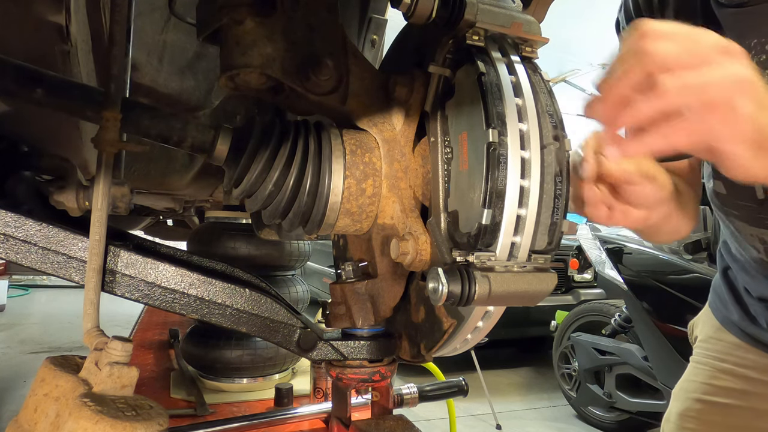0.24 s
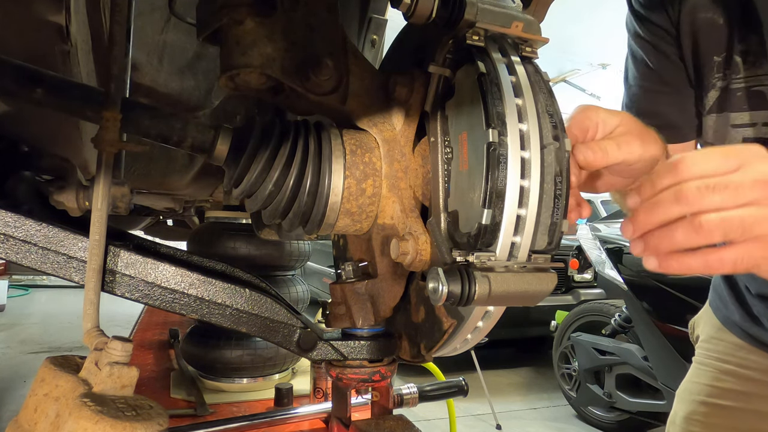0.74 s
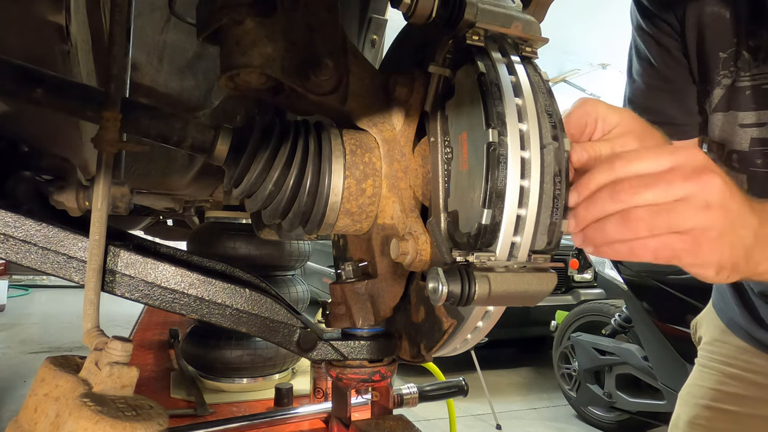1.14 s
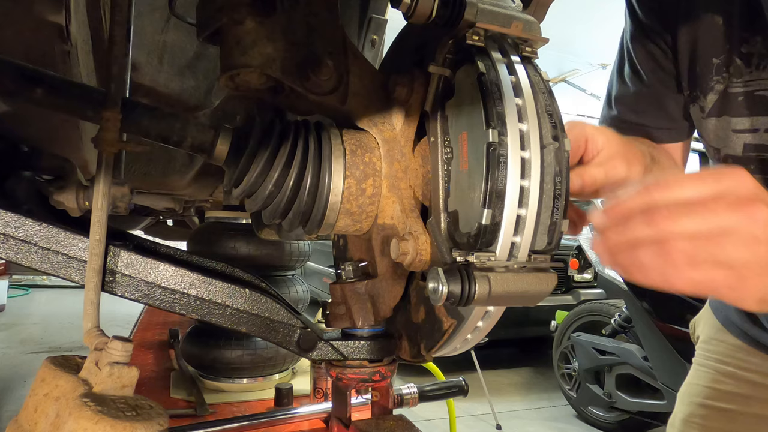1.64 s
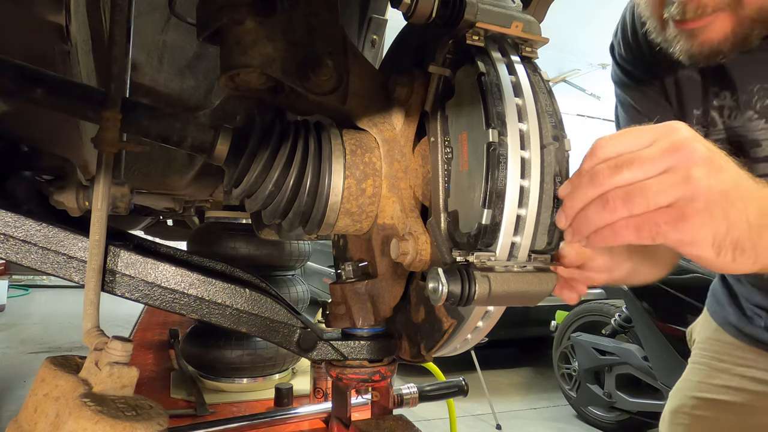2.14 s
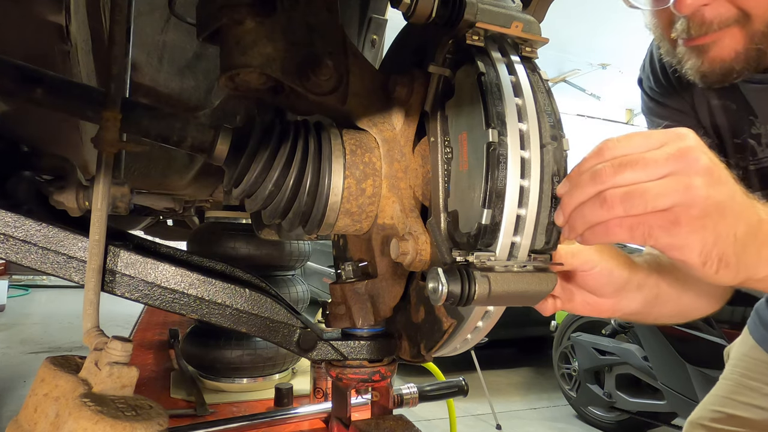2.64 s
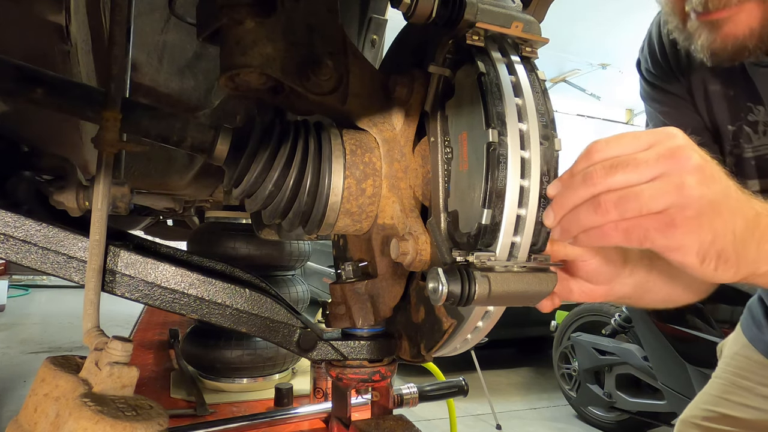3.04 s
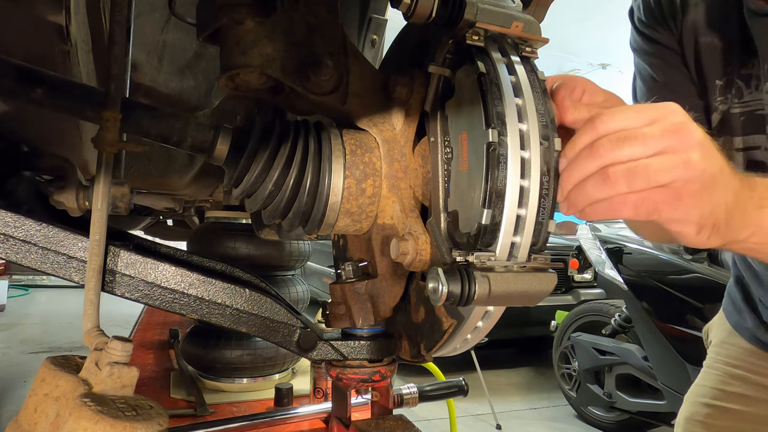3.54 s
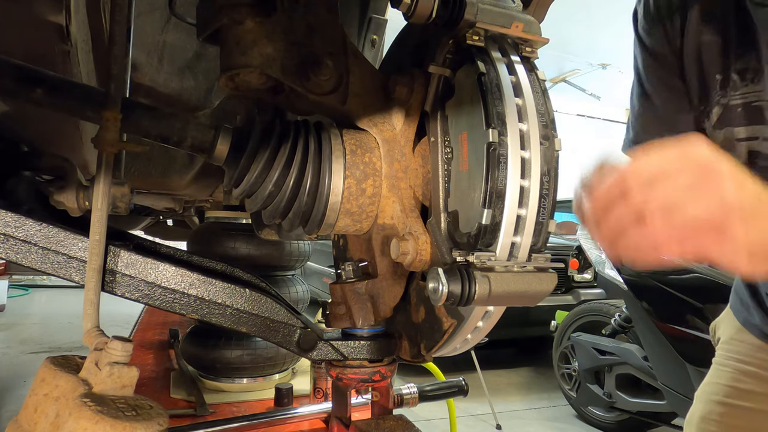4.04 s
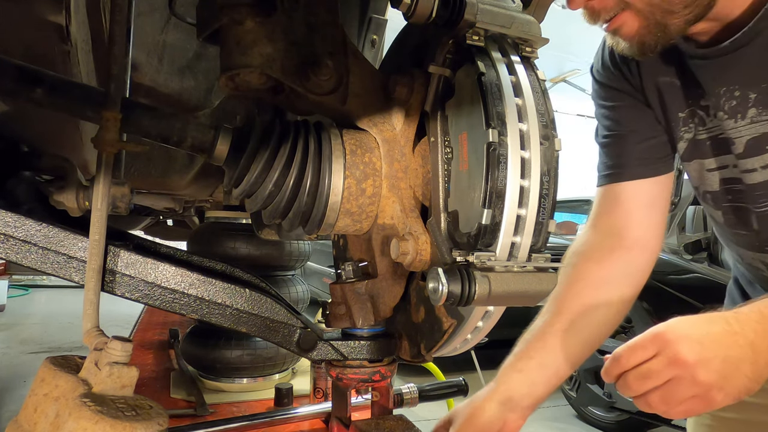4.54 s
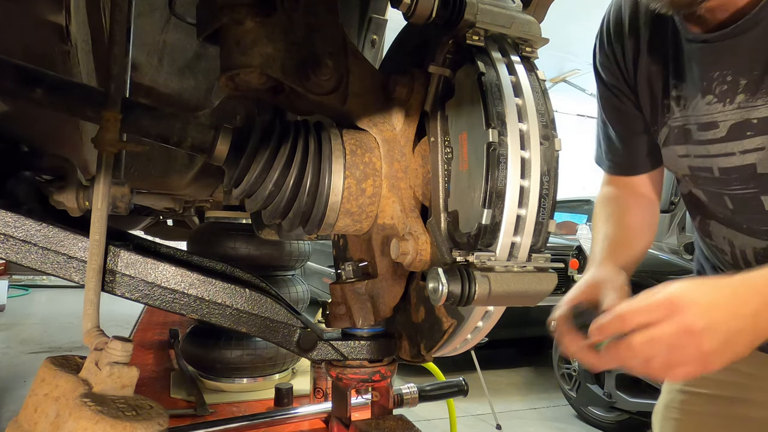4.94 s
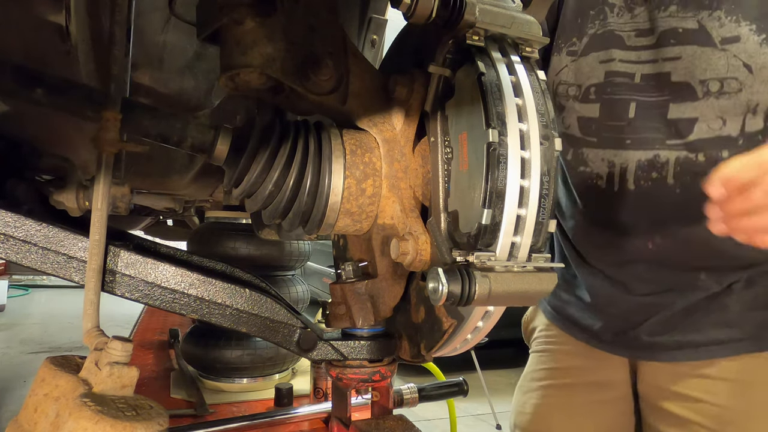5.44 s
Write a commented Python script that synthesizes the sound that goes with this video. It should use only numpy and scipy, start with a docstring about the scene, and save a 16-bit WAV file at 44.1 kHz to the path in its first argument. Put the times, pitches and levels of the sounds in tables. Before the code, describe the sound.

A close microphone hears a brake pad being fitted in a quiet garage, with a short wall echo and a faint low hum of distant machines and street throughout. Right at the start comes a brief scrape and a quick cluster of dull metal knocks. Very faint ticks and rubs follow between 0.4 and 1.6 seconds. From about 2.2 to 2.7 seconds the pad scrapes softly and grittily along its spring clips, with a small click. At 2.8 seconds it snaps home with a loud, sharp double clack, by far the strongest sound; the steel rings briefly and the hub gives a low shudder that dies away by about 3.3 seconds. A few light ticks come between 3.6 and 3.9 seconds. From 4.6 to 5 seconds small parts click, clatter and shuffle at a modest level, and one last light tick sounds near 5.1 seconds.

```python
"""Fitting a brake pad in a quiet garage

Hands work a pad into the spring clips of a caliper bracket. It knocks, scrapes in many tiny
slips and snaps home with a double clack that rings the steel and shakes the hub. Small parts
tick and shuffle afterwards. Two close microphone ports hear it, with the echo of the walls,
over the low hum of distant machines and the street."""
import sys
import numpy as np
from scipy import signal
from scipy.fft import rfft, irfft, next_fast_len
from scipy.io import wavfile
from scipy.ndimage import uniform_filter1d

SR = 44100
rng = np.random.default_rng(int(sys.argv[2]) if len(sys.argv) > 2 else 0)


def to_wav(sig):
    """Store sig (one row per channel, or 1-D mono) as 16-bit WAV at the path in sys.argv[1].

    Samples outside -1..1 are clipped; the rate is SR.
    """
    pcm = np.clip(np.atleast_2d(sig), -1, 1) * 32767
    pcm = np.round(pcm).astype(np.int16)
    wavfile.write(sys.argv[1], SR, pcm.T)  # frames by channels


N = 251811

# Blows on the brake: t/s, snap level/dB, dullness/(dB per octave),
# then level/dB for each of clip, plate, bracket, hub, disc, arm, car body
BLOWS = [(0.014, -34, 10, -56, -42, -53, -54.5, -67, -35.5, -77),
         (0.027, -27.5, 14, -50, -57, -66, -40.5, -92, -30, -71),
         (0.083, -20, 38.5, -65, -18.5, -60, -19, -44, -21.5, -53.5),
         (1.55, -83, 30, -90, -92, -94, -74, -87, -72, -55),
         (2.786, -29, 10, -39, -41, -40, -48, -59, -62.5, -71),
         (2.791, -7, 2.5, -19, -40, -39.5, -41, -50, -35.5, -50.5),
         (2.84, -7, 6.5, -13, -38, -19.5, -33.5, -49.5, -33.5, -38.5),
         (2.851, -23, 18, -39, -13, -35.5, -18, -67, -23, -37.5),
         (2.869, -19, 40, -46, -40, -44, -18.5, -51, -30.5, -34),
         (2.876, -13, 29, -42, -21, -42.5, -14.5, -42.5, -24, -38),
         (2.897, -28, 22.5, -40, -34.5, -40.5, -22, -56, -25, -40),
         (2.93, -53, 27, -51, -57, -59.5, -33, -82, -28, -41.5),
         (2.969, -67, 25, -57, -67, -55, -31.5, -57, -31, -36),
         (3.033, -71, 36, -80, -80, -80, -33, -73, -30, -41.5),
         (3.046, -70, 40, -80, -80, -80, -31, -86, -37, -43),
         (3.07, -69, 22.5, -72, -75, -76.5, -54.5, -72.5, -41, -41),
         (3.168, -86, 32, -70.5, -91, -93.5, -47, -91.5, -52, -49),
         (3.601, -86.5, 23.5, -86.5, -86.5, -89, -63.5, -97, -60, -54.5),
         (3.667, -83.5, 27, -89.5, -83.5, -100.5, -83.5, -98, -65, -53)]
# The tones each part rings with: f/Hz, relative level/dB, time to fade by 60 dB/s
CLIP_TONES = [(2272, -12, .06), (2546, -13, .06), (3082, -17, .07), (3553, -3, .08), (3609, 0, .11),
              (4037, -15, .05), (4834, -14, .07), (6126, -20, .08), (6400, -20, .2), (6860, -12, .06),
              (7840, -21, .06), (9720, -22, .08), (10640, -17, .04)]
PAD_PLATE_TONES = [(1750, -14, .05), (2500, -13, .05), (3348, 0, .12)]
BRACKET_TONES = [(3497, 0, .09), (3515, -12, .4), (3607, -10, .32), (3800, -17, .35), (4190, -1, .05),
                 (4183, -17, .3), (4350, 0, .06), (4490, -11, .33), (4608, -14, .4), (4800, -10, .06),
                 (6010, -25, .5), (6293, -17, .4), (6560, -21, .45), (6845, -18, .55), (7050, -22, .4)]
HUB_TONES = [(580, -5, 0.09), (618, -6, 0.09), (770, -1, 0.07), (810, -1, 0.08), (852, -1, 0.1),
             (890, -2, 0.07), (982, -5, 0.06), (1142, -17, 0.05), (1367, -12, 0.06), (1563, -18, 0.05)]
DISC_TONES = [(2038, -3, 0.65), (2051, -4, 0.5), (2110, -6, 0.14)]
SUSPENSION_ARM_TONES = [(172.7, -8, 0.3), (199, 0.5, 0.067), (245, -8, 0.2), (305, 1, 0.14),
                        (339.2, -8, 0.15), (385, -6, 0.12), (505, -4, 0.09)]
CAR_BODY_TONES = [(40.5, -15, 0.5), (59, -11, .3), (84.8, 0, .4), (99.7, -3, 0.2)]
# Scraping strokes: start t/s, rise/s, hold/s, fall/s, grit level/dB, grit f/Hz,
# hiss level/dB, drag level/dB
SLIDES = [(0.0, 0.0005, 0.009, 0.082, -43.5, 1920, -50, -59),
          (1.185, 0.0073, 0.044, 0.013, -97, 1290, -72, -84),
          (1.483, 0.0036, 0.0085, 0.065, -94, 1890, -65, -77),
          (2.163, 0.025, 0.052, 0.027, -68, 1530, -68.5, -80),
          (2.225, 0.055, 0.069, 0.029, -50.5, 1640, -57.5, -73),
          (2.301, 0.039, 0.025, 0.081, -53, 1220, -59.5, -53.5),
          (2.421, 0.03, 0.022, 0.18, -62, 1310, -66.5, -65.5),
          (2.694, 0.0044, 0.0078, 0.084, -68.5, 1410, -68, -82),
          (4.66, 0.018, 0.026, 0.02, -58, 2850, -56, -59.5),
          (4.716, .008, 0.035, 0.017, -58, 2580, -45.5, -60),
          (4.768, 0.0087, 0.15, 0.098, -74, 2210, -67.5, -87),
          (4.957, 0.011, 0.048, 0.033, -62, 2060, -60, -66)]
# Small parts ticking: t/s, level/dB, f/Hz, time to fade by 60 dB/s (capped at 0.06), share of click
TICKS = [(0.395, -58, 3890, 0.033, 0.05), (1.189, -62, 1160, 0.027, .5), (1.485, -63, 2500, 0.043, 0.38),
         (1.621, -63, 1160, 0.071, 0.84), (2.187, -60, 1580, .04, 0.26), (2.233, -42.5, 1577, 0.079, 0.3),
         (2.697, -67, 1036, 0.034, 0.93), (2.749, -50.5, 1080, 0.073, 0.35), (3.597, -59, 4500, 0.035, 0.9),
         (3.637, -60, 2750, 0.04, .05), (3.664, -48, 1085, 0.05, 0.7), (3.664, -51, 2366, 0.018, 0.13),
         (3.804, -52, 6210, 0.017, 0.73), (3.893, -61, 2400, 0.025, 0.57), (4.64, -58, 2740, 0.041, .4),
         (4.651, -31.5, 693, 0.029, 0.38), (4.675, -53, 3140, 0.057, 0.68),
         (4.693, -35.5, 664, 0.035, 0.53), (4.721, -50, 1140, 0.067, 0.17), (4.741, -34, 3136, 0.053, 0.33),
         (4.731, -42, 5540, 0.067, 0.095), (4.755, -40, 2080, 0.068, 0.08),
         (4.761, -41.5, 4180, 0.085, 0.29), (4.798, -50, 2970, 0.052, 0.73),
         (4.875, -49.5, 1050, 0.085, 0.51), (5.127, -45, 5550, 0.048, 0.26),
         (5.127, -48, 2920, 0.034, 0.21)]
# Tone colour of a snap, a scrape's hiss, the echo and the hum's two layers: f/Hz, relative level/dB
SNAP_COLOUR = [(400, -34), (1500, -16), (2500, -17.5), (4000, -7), (5300, -10), (7000, -2.5), (9000, -10.5),
               (11000, -13), (13000, -26), (16000, -35.5)]
SCRAPE_COLOUR = [(1500, -22.5), (2500, -14.5), (3500, -10), (5500, -12), (8500, -18), (11000, -29.5),
                 (16000, -42)]
ECHO_COLOUR = [(100, -2), (800, -5), (3000, -9), (6000, -8), (12000, -9)]
RUMBLE_COLOUR = [(12, -32), (20, -7.5), (65, -3), (112, -30), (176, 0), (338, -16), (375, -22),
                 (450, -23.5), (580, -53), (990, -120)]
HISS_COLOUR = [(260, -31), (450, -1), (644, -3), (705, -10), (1020, -2), (2330, -12), (3230, -11),
               (3540, -16), (6530, -18), (10000, -29), (15100, -37), (16000, -38)]
# How long the garage echoes: f/Hz, time to fade by 60 dB/s
ECHO_FADE = [(100, 0.3), (260, 0.65), (700, 0.5), (1840, .5), (4850, 0.45), (10000, .38)]
# Balance of the brake and of the hum: f/Hz, left minus right level/dB
BRAKE_BALANCE = [(60, 0), (250, 0), (700, 1.5), (1290, .5), (2380, 3.5), (4400, 1), (8120, -3), (15000, -5)]
HUM_BALANCE = [(60, 1), (200, -8), (400, -7), (1000, -3), (3000, 3.5), (10000, -3)]
# How alike the hum is at the two ports: f/Hz, likeness (0 to 1)
HUM_LIKENESS = [(60, 0.95), (200, 0.21), (700, 0.23), (2500, 0.35), (8000, 1)]
# How far the left port trails the right: f/Hz, phase/rad
PORT_LAG = [(100, .03), (1000, 0.5), (3000, 0.75), (5000, 1.5), (8000, 2.1), (12000, 2.2)]


def brake():
    """Each blow makes a snap and sets seven parts ringing, each by its own amount."""
    steel, heavy, disc = np.zeros((3, N))
    t = np.arange(-60, 16000) / SR  # starts just ahead of the blow
    clip_ring = ring(CLIP_TONES, rise_s=.0008, rough=.5, waver_hz=160)
    plate_ring = ring(PAD_PLATE_TONES, rise_s=.0002, rough=.3, waver_hz=90)
    bracket_ring = ring(BRACKET_TONES, rise_s=.0002, rough=1.1, waver_hz=140)
    disc_ring = ring(DISC_TONES, rise_s=.0009, rough=.3, waver_hz=25)
    body_ring = ring(CAR_BODY_TONES, rise_s=.006, rough=1.2, waver_hz=30)
    noises = rng.standard_normal((len(BLOWS), len(t)))
    for (start, snap_db, dullness, *levels), noise in zip(BLOWS, noises):
        add(steel, start, amp(snap_db) * snap(t, noise, dullness))
        hit = start - t[0]
        for db, part in zip(levels[:3], (clip_ring, plate_ring, bracket_ring)):
            add(steel, hit, amp(db) * filtered(part, lambda f: dulled(f, dullness)))
        hub_db, disc_db, arm_db, body_db = levels[3:]
        # the loose hub and arm waver anew at each blow
        hub_ring = ring(HUB_TONES, rise_s=.0015, rough=.8, waver_hz=80)
        arm_ring = ring(SUSPENSION_ARM_TONES, rise_s=.006, rough=.9, waver_hz=45)
        for db, part in (hub_db, hub_ring), (arm_db, arm_ring), (body_db, body_ring):
            add(heavy, hit, amp(db) * part)
        add(disc, hit, amp(disc_db) * disc_ring)
    return steel, heavy, disc


def snap(t, noise, dullness):
    """A sharp burst, then a duller rattle of tones too crowded to hear apart."""
    noise = noise * (t >= 0)
    burst = noise * fade(t, .012)
    rattle = noise * (fade(t, .055, db=-7) + fade(t, .42, db=-27))
    rattle = filtered(rattle, lambda f: dulled(f, 6))
    crack = filtered(burst + rattle, lambda f: amp(look_up(SNAP_COLOUR, f)) * dulled(f, dullness))
    ending = np.clip((t[-1] - t) / .1, 0, 1) ** 2
    return crack / abs(crack).max() * ending


def ring(tones, rise_s, rough, waver_hz, loosen_s=.012):
    """A struck part's fading tones start firm, then waver as the contact loosens."""
    hz, db, fade_s = np.transpose(tones)[:, :, None]
    t = np.arange(0, 1.3 * fade_s.max(), 1 / SR)
    wobble = wander(len(tones), len(t), waver_hz) + 1j * wander(len(tones), len(t), waver_hz)
    waver = 1 + rough * (1 - np.exp(-t / loosen_s)) * wobble
    waves = fade(t, fade_s, db) * (waver * np.exp(2j * np.pi * hz * t)).imag
    onset = (1 - np.exp(-t / rise_s)) ** 2
    return waves.sum(0) / np.linalg.norm(amp(db)) * np.sqrt(2) * onset


def slide(rise, hold, fall, grit_db, grit_hz, hiss_db, drag_db, slips_per_s=9000, pitch_drop=.17):
    """Tiny uneven slips make grit, bright hiss and low drag as pressure rises, holds and falls."""
    corners = np.cumsum([0, rise, hold, fall])
    t = np.arange(0, corners[-1], 1 / SR)
    slack = np.interp(t, corners, [1, 0, 0, 1])  # 0 at full pressure
    hz = grit_hz * (1 - pitch_drop * t / corners[-1])
    slipping = rng.random(SR)[:len(t)] < slips_per_s / SR
    kicks = rng.standard_normal(SR)[:len(t)]
    size_db = .9 * rng.exponential(1, SR)[:len(t)]
    catch_db = 1.3 * wander(1, SR, hz=70)[0, :len(t)]  # the stroke catches and lets go
    slips = slipping * kicks * amp(size_db + catch_db)
    sinking = unit_level(resonate(resonate(slips, hz, 700), hz, 2000))
    plate = unit_level(filtered(slips, lambda f: 1 / (1 + ((f - 2200) / 900) ** 4)))
    grit = unit_level(filtered(sinking + .5 * plate, lambda f: dulled(f, 12)))
    hiss = unit_level(filtered(slips, lambda f: amp(look_up(SCRAPE_COLOUR, f))))
    drag = unit_level(resonate(resonate(slips, 360, 780), 360, 780))
    sound = (amp(grit_db - 12.5 * slack) * grit
             + amp(hiss_db - 15 * slack) * hiss
             + amp(drag_db - 18.5 * slack) * drag)
    return sound * signal.windows.tukey(len(t), .05)


def ticks():
    """Small parts touch: each gives a click and a short, rough ring at its own pitch."""
    t, out = np.arange(3000) / SR, np.zeros(N)
    for start, db, hz, fade_s, share in TICKS:
        noise = rng.standard_normal(len(t))
        click = filtered(noise, lambda f: f / (f + hz) * dulled(f, 20) / (1 + (f / 8000) ** 8))
        roughness = resonate(resonate(noise, hz, .25 * hz), hz, .4 * hz)
        tone = np.sin(2 * np.pi * hz * t) + 1.1 * unit_level(roughness)
        shape = fade(t, min(fade_s, .06), db) * (1 - np.exp(-t / .001)) ** 2
        add(out, start, shape * ((1 - share) * tone + share * unit_level(click)))
    return out


def garage_echo(sound):
    """The walls return many small echoes; each pitch range fades at its own speed."""
    echoes = np.zeros((2, SR))
    arrivals = np.arange(300, SR - 20, 20) + rng.integers(0, 20, (2, (SR - 301) // 20))
    np.put_along_axis(echoes, arrivals, rng.choice([-1., 1.], arrivals.shape), 1)
    hz, t, (left, other) = signal.stft(echoes, SR, nperseg=256)
    hz = hz[:, None]
    likeness = 1 / (1 + (hz / 800) ** 2)  # the bass is alike at both ports
    bands = np.array([left, blend(left, other, likeness)])
    fade_s = look_up(ECHO_FADE, hz)
    bands *= fade(t, fade_s, look_up(ECHO_COLOUR, hz)) / np.sqrt(fade_s * 160)
    tail = signal.istft(bands, SR, nperseg=256)[1]
    return signal.fftconvolve(sound[None], tail, axes=1)[:, :N]


def hum(rumble_db=-60, hiss_db=-70):
    """Distant machines and street rumble: noise that swells in patches, most of all in the bass."""
    frames, hz = N // 256 + 5, np.fft.rfftfreq(1024, 1 / SR)[:, None]
    noise = rng.standard_normal((frames, 513, 5)).T
    left, other = noise[0] + 1j * noise[1], noise[2] + 1j * noise[3]
    right = blend(left, other, look_up(HUM_LIKENESS, hz))
    bands = np.array([left * np.exp(-1j * look_up(PORT_LAG, hz)), right])
    bands *= pan(look_up(HUM_BALANCE, hz))
    bands /= np.sqrt(np.mean(abs(bands.mean(0)) ** 2, 1, keepdims=True))  # even out the bands
    patches = unit_level(uniform_filter1d(uniform_filter1d(noise[4], 6, 0), 16, 1))
    swell_db = patches * (1.3 + 2.6 / (1 + (hz / 110) ** 2))
    rumble = amp(rumble_db) * unit_level(amp(look_up(RUMBLE_COLOUR, hz)))
    hiss = amp(hiss_db) * unit_level(amp(look_up(HISS_COLOUR, hz)))
    bands *= np.hypot(rumble, hiss) * amp(swell_db)
    pair = signal.istft(bands, nperseg=1024, noverlap=768)[1][:, :N]
    return np.hypot(amp(rumble_db), amp(hiss_db)) * pair / np.sqrt(np.mean(pair.mean(0) ** 2))


def ports(pair):
    """Sound reaches the left port a little after the right."""
    return filtered(pair, lambda f: np.exp(-.5j * np.multiply.outer([1, -1], look_up(PORT_LAG, f))))


def amp(db):
    return 10 ** (np.asarray(db) / 20)


def fade(t, fade_s, db=0):
    """Starts at db and falls 60 dB every fade_s seconds."""
    return amp(db - 60 * t / fade_s)


def dulled(hz, db_per_octave):
    """A soft contact loses treble above 3 kHz."""
    return amp(-db_per_octave * np.log2(1 + (hz / 3000) ** 2) / 2)


def unit_level(x):
    return x / np.sqrt(np.mean(x ** 2) + 1e-20)


def look_up(table, hz):
    """Reads between a table's rows, on a pitch scale."""
    f, value = np.transpose(table)
    return np.interp(np.log(hz + 1), np.log(f + 1), value)


def add(mix, start_s, sound):
    part = mix[round(start_s * SR):][:len(sound)]
    part += sound[:len(part)]


def filtered(x, gain):
    """Scales each frequency f by gain(f)."""
    size = next_fast_len(x.shape[-1])
    return irfft(rfft(x, size) * gain(np.fft.rfftfreq(size, 1 / SR)), size)[..., :x.shape[-1]]


def resonate(x, hz, width_hz):
    """Keeps a band around hz: shifts it down to zero, smooths, and shifts back."""
    turn = np.exp(2j * np.pi * np.cumsum(hz * np.ones(len(x))) / SR)
    memory = np.exp(-np.pi * width_hz / SR)
    return 2 * (turn * signal.lfilter([1 - memory], [1, -memory], x / turn)).real


def wander(count, size, hz):
    """Smooth random curves with about hz new values a second."""
    steps = rng.standard_normal((count, int(size * hz / SR) + 2))
    return signal.resample(steps, size, axis=1)


def blend(noise, other, likeness):
    """Makes a noise partly like the first, and just as loud."""
    return likeness * noise + np.sqrt(1 - likeness ** 2) * other


def pan(balance_db):
    """Left and right gains, balance_db apart."""
    return amp(np.multiply.outer([.5, -.5], balance_db))


def scene():
    """Mixes the brake, the small sounds, their echo and the hum."""
    small = ticks()
    steel, heavy, disc = brake()
    for start, *stroke in SLIDES:
        add(small, start, slide(*stroke))
    near = filtered(steel + heavy + disc, lambda f: pan(look_up(BRAKE_BALANCE, f)))
    # heavy and small parts reach the walls less; the faint disc is heard only close by
    echo = garage_echo(steel + amp(-5) * heavy + amp(-1) * small)
    return ports(near + small + echo) + hum()


def record(dry):
    """Cuts the treble above 16.1 kHz."""
    low_pass = signal.firwin(511, 16100, window=("kaiser", 9), fs=SR)
    return signal.oaconvolve(dry, low_pass[None], "same")


dry = scene()
out = record(dry)
to_wav(out)
```